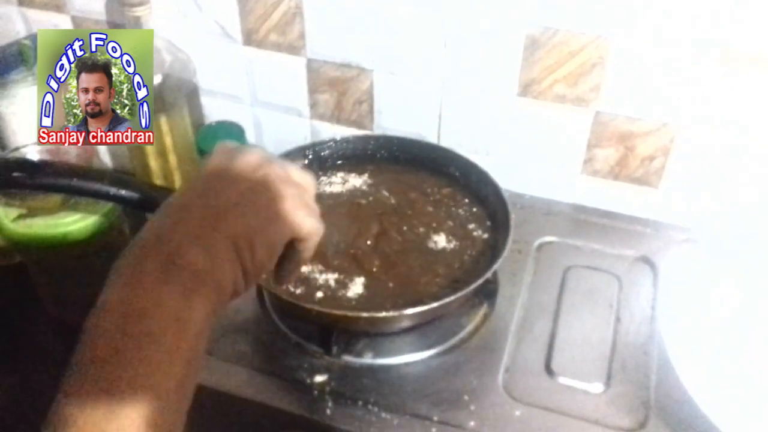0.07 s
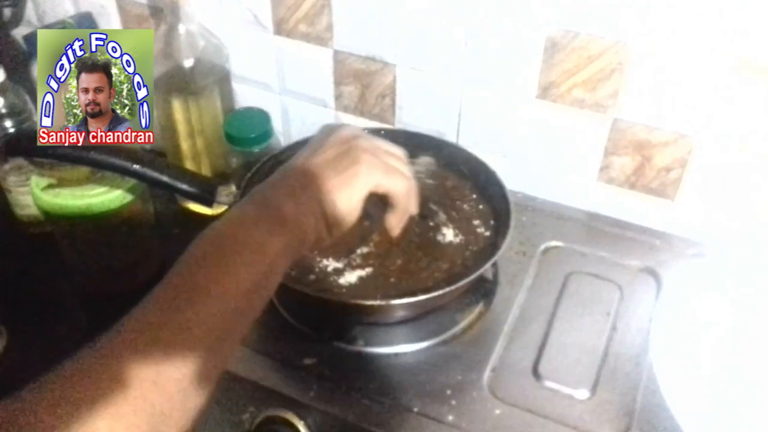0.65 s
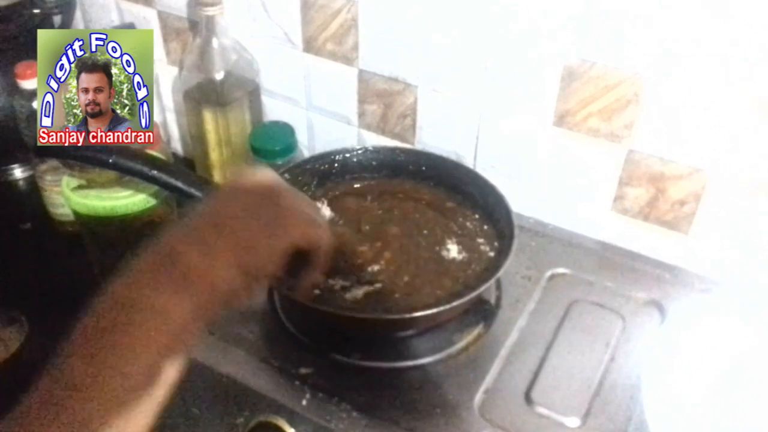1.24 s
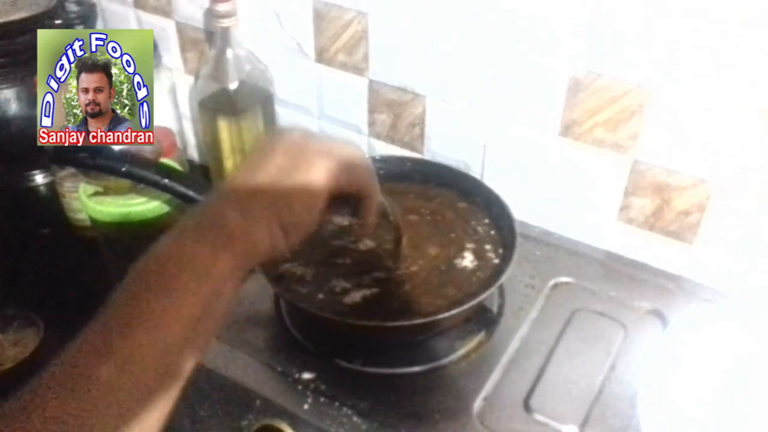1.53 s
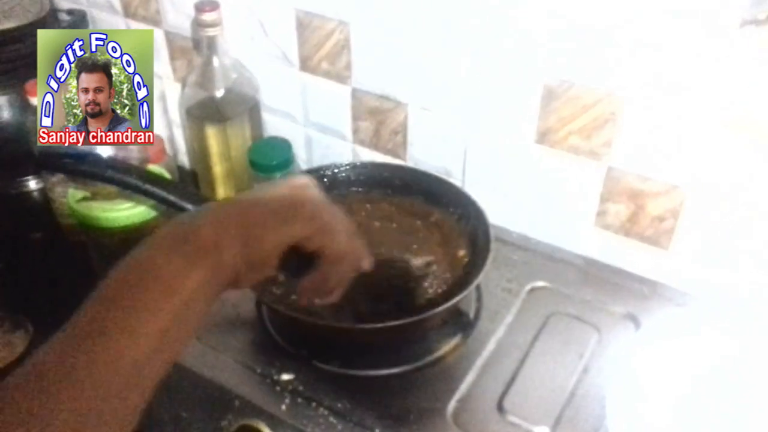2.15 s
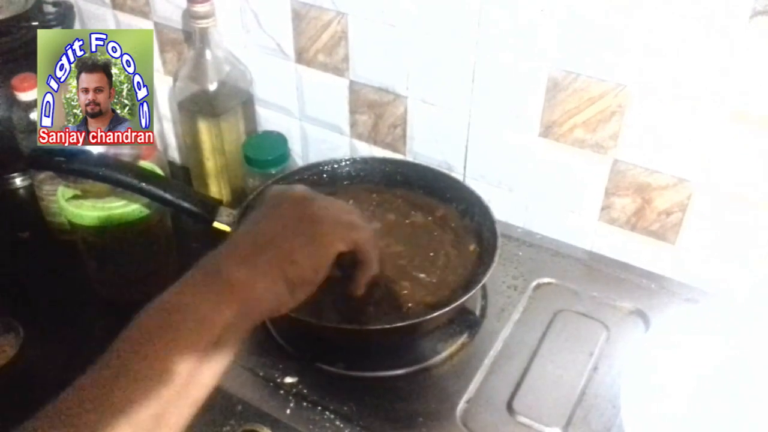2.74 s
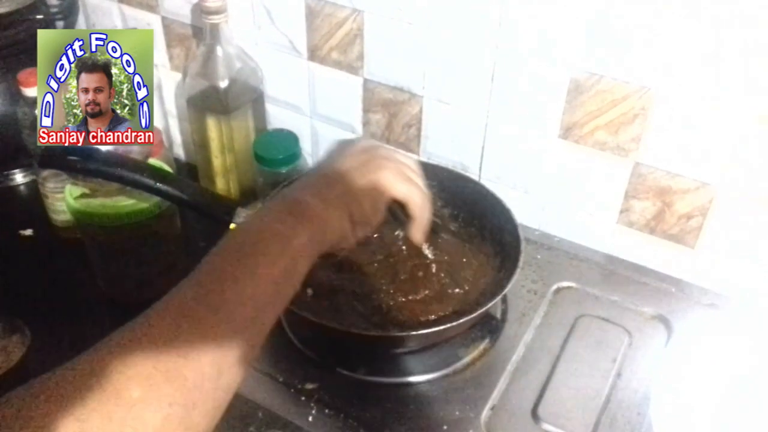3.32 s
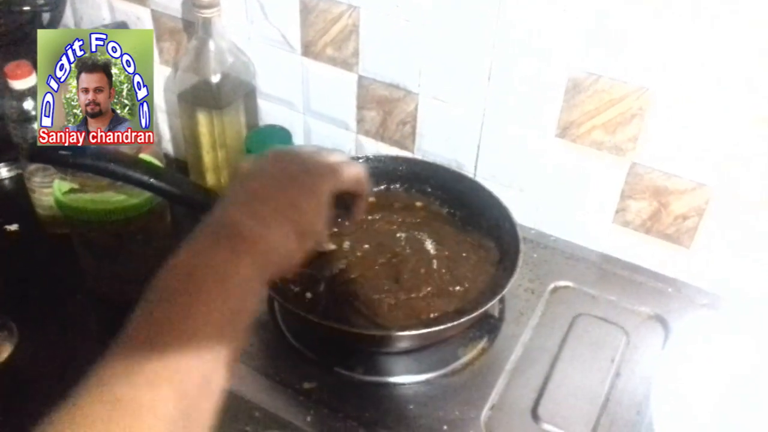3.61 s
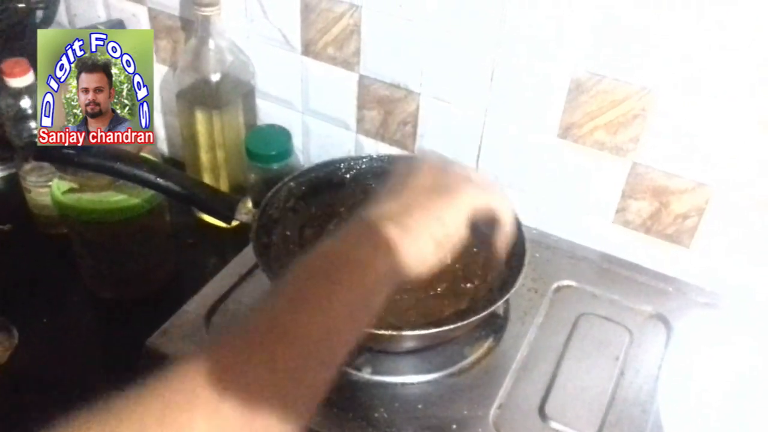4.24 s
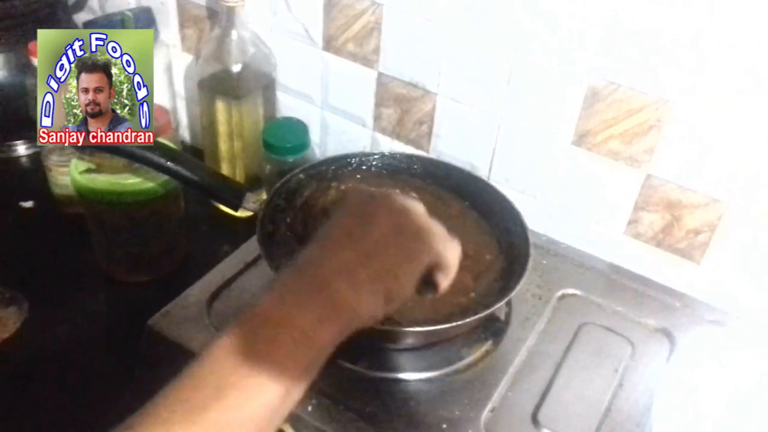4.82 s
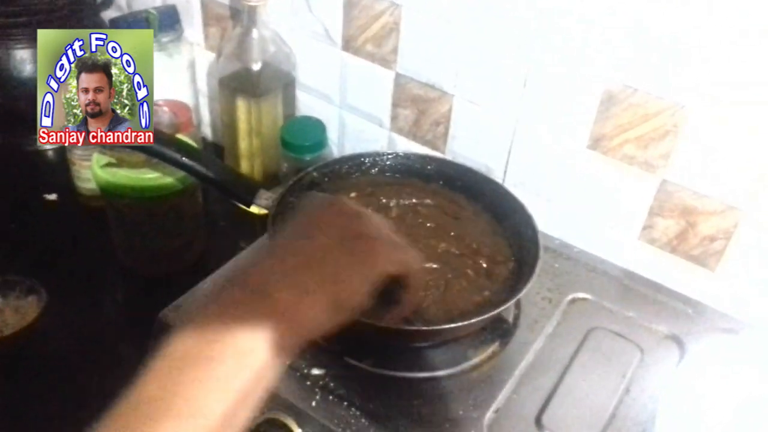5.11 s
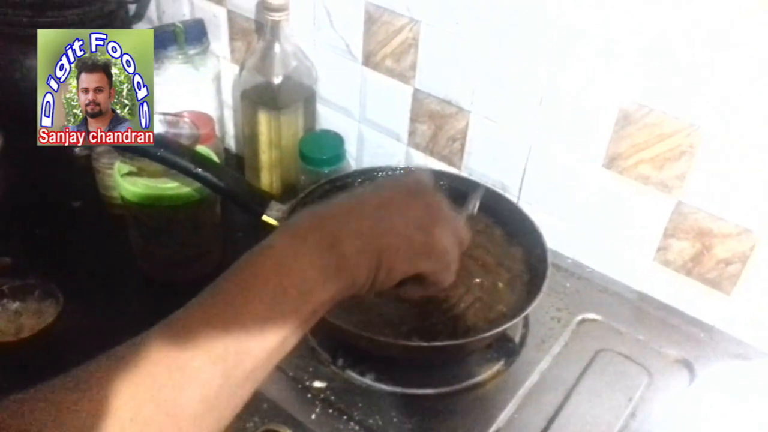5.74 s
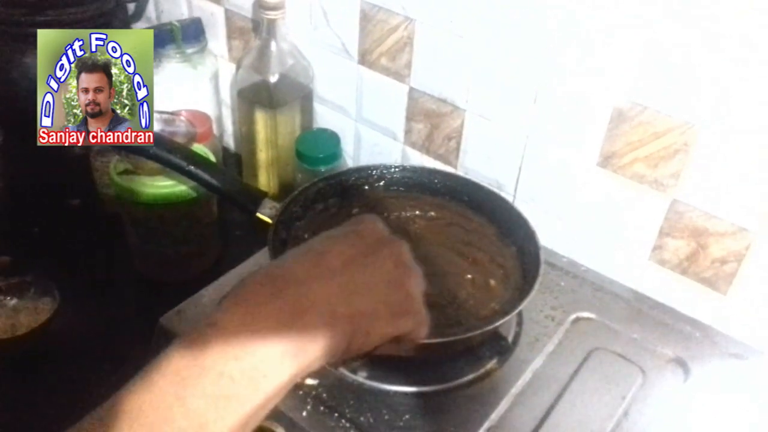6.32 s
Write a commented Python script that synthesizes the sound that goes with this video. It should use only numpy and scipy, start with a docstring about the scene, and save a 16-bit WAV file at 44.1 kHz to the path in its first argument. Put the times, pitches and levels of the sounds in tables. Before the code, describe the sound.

A finger covers the microphone, muffling a kitchen under low rumble and soft thumps. It slides off with loud, sharp cracks. Now a spoon is heard close by, stirring a thick mixture that sizzles and pops in a pan. The spoon drags, knocks, briefly judders and rasps on the bottom, while a gas burner hisses softly and a cricket chirps faintly and very high.

```python
"""At first a finger covers the microphone, and a tiled kitchen is muffled under rumble and soft thumps.
At about 1.4 s it slides off with sharp cracks, uncovering a hissing gas burner, a cricket's high, steady
wing chirps and a spoon stirring a thick sweet mixture that sizzles and pops as its bubbles burst.
The spoon drags and knocks, ringing the pan on its stand; later it judders by stick-slip friction,
and near 4.7 s its edge rasps over the gritty bottom."""
import sys
import numpy as np
from scipy import signal
from scipy.fft import rfft, irfft
from scipy.io import wavfile
from scipy.ndimage import uniform_filter1d

SR = 44100
rng = np.random.default_rng(int(sys.argv[2]) if len(sys.argv) > 2 else 0)


def master_out(mix):
    """Clip the mix to full scale and print it as 16-bit PCM to the path in sys.argv[1]."""
    frames = np.transpose(np.atleast_2d(mix))
    ceiling = np.clip(frames, -1, 1)
    pcm = np.round(ceiling * 32767).astype(np.int16)
    wavfile.write(sys.argv[1], SR, pcm)


N = 285056
TIME = np.arange(N) / SR
BINS = np.fft.rfftfreq(N, 1 / SR)


def amp(db):
    """Decibels to amplitude ratio."""
    return 10 ** (np.asarray(db) / 20)

def unit(x):
    """Normalises to rms 1."""
    return x / np.sqrt(np.mean(x ** 2) + 1e-20)

def read(points, hz):
    """Interpolates on a log-frequency axis."""
    f, value = np.transpose(points)
    return np.interp(np.log(hz + 1), np.log(f + 1), value)

def colour(x, points):
    """Filters by a magnitude response in dB."""
    return irfft(rfft(x) * amp(read(points, np.fft.rfftfreq(len(x), 1 / SR))), len(x))

def band(x, hz, q):
    """A second-order resonator of peak gain 1."""
    hz = min(hz, .4 * SR)
    return signal.lfilter(*signal.iirpeak(hz, max(q, hz / (.4 * SR)), SR), x)

def resonances(modes):
    """Steep resonance peaks add in power."""
    return sum(amp(db) ** 2 / (1 + ((BINS - hz) / width) ** 2) ** 2 for hz, width, db in modes)

def shaped_noise(magnitude):
    """Gaussian noise of rms 1 with a given spectral shape."""
    return unit(irfft(rfft(rng.standard_normal(N)) * magnitude, N))

def drift(rate_hz):
    """Slow random modulation: low-passed noise."""
    return shaped_noise(np.exp(-(BINS / rate_hz) ** 2))

def swell(middle_s, length_s):
    """A Gaussian envelope."""
    return np.exp(-(2 * (TIME - middle_s) / length_s) ** 2)

def add(mix, s, sound):
    """Superposes a sound from second s."""
    part = mix[max(round(s * SR), 0):][:len(sound)]
    part += sound[:len(part)]


# Rubbing under the finger. Each row: frequency in Hz, relative density in dB.
RUB_SPECTRUM = [(15, -37.5), (25, 1.5), (130, 6.5), (427, -7.5), (887, -23), (1230, -21), (1650, -29),
                (2990, -25.5), (4140, -26), (4490, -25), (7710, -31.5), (16000, -30)]
# Transmission past the finger. Each row: frequency in Hz, gain in dB.
FINGER_TRANSMISSION = [(200, -1), (500, -3), (1000, -6.5), (2000, -12.5), (4500, -25), (8000, -46),
                       (16000, -55.5)]
UNCOVER_S = 1.432

def finger_cover(air, rub_db=-57, lumps_db=2.5, slide_s=0.0059,
                 rest_db=-3, press_s=.26, press_db=4.5, relax_db_per_s=6.5):
    """Transmission loss: the finger muffles and rumbles as it rests, presses and relaxes, then lifts."""
    opened = .5 + .5 * np.tanh((TIME - UNCOVER_S) / slide_s)
    rub = unit(colour(rng.standard_normal(N), RUB_SPECTRUM))
    rumble = signal.sosfiltfilt(signal.butter(2, 280, fs=SR, output="sos"), rub)
    force_db = np.where(TIME < press_s, rest_db, press_db - relax_db_per_s * (TIME - press_s))
    force_db = uniform_filter1d(force_db, size=1000) + lumps_db * drift(22)
    rub = amp(rub_db) * (rub + rumble * (amp(force_db) - 1))
    return opened * air + (1 - opened) * (colour(air, FINGER_TRANSMISSION) + rub)


# Gas hiss. Each row: frequency in Hz, relative density in dB.
GAS_SPECTRUM = [(30, -19), (80, -10), (150, -1.5), (300, -18), (600, -10), (1200, 2), (2200, 0), (3000, -8),
                (5500, -5), (7500, 1.5), (9300, 0), (11000, -13), (16000, -28)]
# Jet and tube resonances. Each row: frequency in Hz, width in Hz, relative level in dB.
BURNER_MODES = [(270, 11, 8.2), (389, 15, 7.6), (844, 32, 7), (1613, 51, 9.3), (1900, 110, 3.3),
                (2286, 134, 4.9), (3940, 293, 7.2)]

def burner(level_db=-53.0, waver_db=0.6):
    """Flow noise: gas rushing through the jet excites the burner tube's resonances."""
    power = amp(read(GAS_SPECTRUM, BINS)) ** 2 + resonances(BURNER_MODES)
    return shaped_noise(np.sqrt(power)) * amp(level_db + waver_db * drift(6.6))


# The cricket's loudness. Each row: time in seconds, level in dB.
CRICKET_LEVELS = [(1.5, -51.5), (1.8, -55), (2.7, -55), (2.88, -50.5), (3.9, -51), (5.2, -51.5),
                  (6.46, -50.5)]
# Wing resonances. Each row: frequency in Hz, width in Hz, relative level in dB.
WING_MODES = [(8270, 90, -3), (8410, 88, 5), (8300, 68, -7), (8735, 37, 7)]

def cricket(chirps_per_s=9.42, crest_s=1.958, depth_db=5, uneven_db=0.1):
    """Stridulation: regular strokes excite narrow wing resonances, which never quite fall silent."""
    wings = shaped_noise(np.sqrt(resonances(WING_MODES)))
    cycle = np.cos(2 * np.pi * chirps_per_s * (TIME - crest_s))
    strokes = amp(depth_db * cycle + uneven_db * drift(24))
    return unit(wings * strokes) * amp(np.interp(TIME, *np.transpose(CRICKET_LEVELS)))


# Briskness of the spoon. Each row: time in seconds, effort in dB relative to steady stirring.
STIRRING_EFFORT = [(1.48, -3), (1.54, -4.5), (1.7, -13.5), (1.93, -23), (2.04, -0.5), (2.2, -7.5),
                   (2.35, -4.5), (2.52, -12.5), (2.7, -10.5), (2.8, -2), (2.96, 4.5), (3.12, -2),
                   (3.38, 1.5), (4.0, 0.5), (4.52, 1.5), (4.69, 7.0), (4.86, 3), (5.12, 0.5), (5.42, 2),
                   (5.6, -0.5), (5.75, 1), (6.46, 0.5)]

def effort(follow):
    """Amplitude modulation by the stirring: `follow` dB per dB of effort."""
    return amp(follow * np.interp(TIME, *np.transpose(STIRRING_EFFORT)))


# The pan on its stand. Each row: frequency in Hz, relative level in dB, 60 dB decay time in seconds.
PAN_MODES = [(261, -2.5, 0.24), (293.1, 4.5, 0.21), (332, 3.5, 0.047), (399, -9, 1), (454.8, -1, 0.34),
             (506, -4, 0.17), (535, -45, 0.15), (660, -23, 0.13), (693.5, -4, 0.23), (818, 5.5, 0.037),
             (896, 2.5, 0.048), (1110, -5.5, 0.1), (1332, -8, 0.84), (1546, -1.5, 0.21), (1780, -1, 0.071)]

def pan_ring(length):
    """Modal superposition: the pan rings as damped sinusoids of random phase."""
    t = np.arange(length) / SR
    return sum(amp(db - 60 * t / t60) * np.sin(2 * np.pi * (hz * t + rng.random()))
               for hz, db, t60 in PAN_MODES)


# Spoon friction. Each row: frequency in Hz, relative density in dB.
DRAG_SPECTRUM = [(50, -55), (110, -12.5), (200, -4.5), (280, 5), (450, -4), (650, -3.5), (1000, -6.5),
                 (2000, -17.5)]

def dragging(glide_db=-56, follow=0.72, push_db=-49, ring_db=-7, slip_db=1.5):
    """Sliding friction drives the pan's modes, lightly as the spoon glides and harder in each push."""
    rub = rng.standard_normal(N) * amp(slip_db * drift(30))
    body = unit(signal.oaconvolve(rub, pan_ring(SR // 4))[:N])
    level = np.hypot(amp(glide_db) * effort(follow), amp(push_db) * pushes())
    return level * unit(unit(colour(rub, DRAG_SPECTRUM)) + amp(ring_db) * body)


def grains(per_s, spread_db, low_hz, high_hz, cycles, count=24):
    """Shot noise: tiny random bursts, each a damped ring, in many pitches and sizes."""
    out = np.zeros(N)
    for hz in np.geomspace(low_hz, min(high_hz, .45 * SR), count):
        turns = np.arange(600) * hz / SR
        ring = np.sin(2 * np.pi * turns) * np.exp(-turns / cycles) * np.sqrt(hz)
        size = amp(spread_db * np.minimum(rng.exponential(1, N), 4))
        onsets = rng.random(N) < per_s / count / SR
        out += signal.oaconvolve(size * onsets, ring)[:N]
    return unit(out)

def texture(grain, share, spectrum):
    """Incoherent sum: near grains take a share of the power, a blur of smaller ones the rest."""
    blur = np.sqrt(1 - share) * rng.standard_normal(N)
    return unit(colour(np.sqrt(share) * grain + blur, spectrum))


# The pan's hollow. Each row: frequency in Hz, width in Hz, relative level in dB.
CAVITY_MODES = [(845, 108, 11), (1662, 100, 2.5), (2355, 140, 0), (3840, 380, 0), (8430, 214, 18.5)]

def pan_cavity(x):
    """Cavity resonance colours a sound in the pan; the result has rms 1."""
    return unit(irfft(rfft(x) * np.sqrt(1 + resonances(CAVITY_MODES)), N))


# Churning mixture, sizzle and fine spray. Each row: frequency in Hz, relative density in dB.
CHURN_SPECTRUM = [(300, -8), (600, -17.5), (880, -4), (1200, 2), (1660, 7), (2300, 5), (3000, -1),
                  (3800, 6), (6000, -22)]
SIZZLE_SPECTRUM = [(1500, -15), (3000, -13), (3900, 5), (5000, 5), (6000, 0.5), (7000, 5), (7800, -8),
                   (9200, 1), (10500, -38), (13000, -22), (16000, -44)]
SPRAY_SPECTRUM = [(6000, -10.5), (9000, 1), (11000, -11), (13000, -15), (16000, -42)]

def frying(churn_db=-48.0, sizzle_db=-49, spray_db=-58.5, bared_db=-55, flicker_db=0.84):
    """Boiling: stirring churns the mixture onto hot metal; pushes bare the bottom and add spray."""
    wet = texture(grains(per_s=700, spread_db=-0.5, low_hz=579.6, high_hz=4040, cycles=8.2),
                  0.14, CHURN_SPECTRUM)
    fizz = texture(grains(per_s=900, spread_db=0.5, low_hz=2920, high_hz=10250, cycles=4.5),
                   0.3, SIZZLE_SPECTRUM)
    mist = texture(grains(per_s=390, spread_db=8.0, low_hz=8550, high_hz=15700, cycles=9.7),
                   0.081, SPRAY_SPECTRUM)
    churn = amp(churn_db) * effort(follow=1.0) * pan_cavity(wet)
    sizzle = np.hypot(amp(sizzle_db) * effort(follow=1.12), flares()) * pan_cavity(fizz)
    spray = np.hypot(amp(spray_db) * effort(follow=2.65), amp(bared_db) * pushes()) * mist
    return (churn + sizzle + spray) * amp(flicker_db * drift(31))

def spits(level_db=-57, follow=0.55):
    """Sparse shot noise: tiny drops spit out of the sizzle."""
    drops = grains(per_s=45, spread_db=3, low_hz=4200, high_hz=10500, cycles=7)
    return drops * amp(level_db) * effort(follow)

def pop(hz, width_hz=1450, snap_db=-13, t60_s=0.016):
    """Transient excitation: a bubble's skin tears and rings the cavity under it."""
    t = np.arange(2048) / SR
    tear = rng.standard_normal(len(t)) * amp(-60 * t / t60_s)
    q = min(hz / width_hz, 3.8)
    burst = band(band(tear, hz, q), hz, q / 2) + amp(snap_db) * band(tear, hz, q / 3)
    return burst / np.std(burst[:SR // 500])

def simmer(count, centre_hz, level_db=-41.5, spread_db=3.5, pitch_spread=0.15):
    """Like bubbles resonate alike: middling ones burst at random, louder while the spoon is brisk."""
    out, level = np.zeros(N), effort(follow=1.0)
    for k, (when, size, pitch) in enumerate(2 * rng.random((count, 3)) - 1):
        at = int((k + when) % count * N / count)
        burst = pop(centre_hz * (1 + pitch_spread * pitch))
        add(out, at / SR, level[at] * amp(level_db + spread_db * size) * burst)
    return out


def slip(s, hz, damping=2.7, open_edge_hz=12000, loosen_s=0.012):
    """A pressure step leaks from the port in one damped swing; a looser seal sharpens its edge."""
    t = np.arange(4096) / SR
    looseness = np.exp(min(s - UNCOVER_S, 0) / loosen_s)
    edge_hz = np.clip(open_edge_hz * looseness, 2.6 * hz, 7.2 * hz)
    swing = -np.cos(2 * np.pi * hz * t + np.arctan(damping / (2 * np.pi))) * np.exp(-damping * hz * t)
    for corner in (edge_hz, 2 * edge_hz):
        swing = signal.lfilter(*signal.butter(1, min(corner, .45 * SR), fs=SR), swing)
    return swing / abs(swing).max()


# Slips on the microphone port. Each row: start in seconds, peak level in dB, swing frequency in Hz.
FINGER_SLIPS = [(0.071, -43, 91), (0.12, -41, 100), (0.628, -31.5, 104), (0.721, -26.5, 84.5),
                (0.789, -30.5, 69.6), (1.236, -35.5, 202), (1.328, -32.5, 269), (1.3662, -24.5, 1560),
                (1.381, -19, 308), (1.385, -18, 226), (1.4045, -21, 500), (1.4165, -2, 1470),
                (1.417, -6, 290), (1.424, -11, 1000), (1.434, -9.5, 980), (1.462, -5, 880)]
# Skin scrapes. Each row: middle in seconds, length in seconds, level in dB, centre frequency in Hz.
SKIN_SCRAPES = [(1.418, 0.0062, -25.5, 1920), (1.445, 0.0084, -46, 7200), (1.46, 0.0023, -27.5, 8000)]

def finger_noise(crunch_db=-27, crunch_from_s=1.396, crunch_s=.056, swing_hz=750, count=14):
    """Stick-slip: the finger thumps; as it leaves it cracks, tiny slips crunch and the skin drags."""
    out = np.zeros(N)
    for s, db, hz in FINGER_SLIPS:
        add(out, s, amp(db) * slip(s, hz))
    for k, (when, size, pitch) in enumerate(rng.random((count, 3))):
        s = crunch_from_s + crunch_s * (k + when) / count
        add(out, s, amp(crunch_db) * size * slip(s, swing_hz * (.5 + pitch)))
    for s, length, db, hz in SKIN_SCRAPES:
        scrape = unit(band(rng.standard_normal(N), hz, q=3))
        out += amp(db) * scrape * swell(s, length)
    return out


# Rattle of stand and stove top. Each row: frequency in Hz, relative density in dB.
RATTLE_SPECTRUM = [(80, -32), (180, -36), (280, -3.5), (480, -19.5), (800, -5), (1500, -13), (2500, -3),
                   (5000, -35)]
# Spoon blows. Each row: start in seconds, relative level in dB, centre in Hz, rattle decay in seconds.
SPOON_KNOCKS = [(0.277, -33, 434, 0.31), (0.53, -39, 1110, .07), (0.565, -39, 1140, 0.057),
                (0.916, -31, 485, .55), (1.049, -34.5, 565, .28), (1.353, -21.5, 585, 0.29),
                (2.012, -26.5, 320, 0.27), (2.725, -28, 410, 0.37), (2.929, -36, 443, 0.29),
                (3.515, -31.5, 650, 0.29), (3.819, -22.5, 1000, 0.071), (3.834, -31, 595, .11),
                (4.372, -27, 288, 0.099), (4.971, -30, 860, 0.35), (5.204, -19.5, 556, 0.21),
                (5.407, -31, 400, 0.09)]

def knocks(level_db=-12, ring_db=-8, rattle_db=-3, q=1.0, rise_s=0.0013, hardness=3.1):
    """Impact excitation: the pan rings and its stand rattles; lower-pitched blows are duller."""
    out, t = np.zeros(N), np.arange(16384) / SR
    attack = 1 - np.exp(-t / rise_s)
    for s, db, hz, t60 in SPOON_KNOCKS:
        rattle = unit(colour(rng.standard_normal(len(t)), RATTLE_SPECTRUM)) * amp(-60 * t / t60)
        ring = pan_ring(len(t)) * amp(-30 * t / t60)  # spoon and mixture damp the pan
        blow = band(amp(rattle_db) * rattle + amp(ring_db) * ring / np.std(ring[:SR // 40]), hz, q)
        blow = signal.lfilter(*signal.butter(2, min(hardness * hz, .4 * SR), fs=SR), blow)
        add(out, s, amp(db + level_db) * blow / np.std(blow[:SR // 40]) * attack)
    return out


# The largest bubbles. Each row: start in seconds, relative level in dB, pitch in Hz.
BIG_BUBBLES = [(1.05, -16.5, 4970), (2.031, -23.5, 4220), (2.079, -27, 5330), (2.174, -33.5, 4470),
               (2.269, -32.5, 4860), (2.348, -33.5, 4270), (2.869, -24, 4200), (2.929, -25, 4860),
               (2.985, -23, 7230), (3.187, -34.5, 4560), (3.528, -33, 5440), (3.819, -25, 4770),
               (3.842, -25.5, 5300), (4.003, -34, 4740), (4.103, -31, 4140), (4.144, -32, 4860),
               (4.262, -27, 5150), (4.354, -25.5, 4530), (4.364, -32, 11800), (4.546, -27, 8800),
               (4.972, -25, 4000), (5.177, -30.5, 4960), (5.355, -27.5, 4800), (5.406, -29.5, 5750),
               (5.678, -31.5, 7000), (6.204, -32, 7240)]

def big_pops(level_db=-6):
    """Film rupture: the largest bubbles snap one by one, each at its own resonance."""
    out = np.zeros(N)
    for s, db, hz in BIG_BUBBLES:
        add(out, s, amp(db + level_db) * pop(hz))
    return out


# Surges of sizzle. Each row: start in seconds, level in dB.
SIZZLE_FLARES = [(1.47, -52), (2.975, -35.5), (4.68, -38), (4.81, -40), (5.672, -43)]

def flares(rise_s=.006, t60_s=0.31):
    """Flash boiling: the sizzle's level leaps as wet mixture meets bare hot metal, then decays."""
    return sum(amp(db - 60 * np.maximum(TIME - s, 0) / t60_s) * np.clip((TIME - s) / rise_s, 0, 1)
               for s, db in SIZZLE_FLARES)


# The spoon bears down. Each row: start in seconds, length in seconds, relative force in dB.
SPOON_PUSHES = [(2.092, 0.38, -9), (2.735, 0.23, -7), (3.195, 0.4, 1), (3.494, 0.43, -0.5),
                (4.343, 0.49, 1), (5.3, 0.25, 3.5)]

def pushes(rise_s=0.11, fall_s=0.16):
    """Normal force of the spoon on the bottom: each push ramps up and lets go."""
    return sum(amp(db) * np.clip(np.minimum((TIME - s) / rise_s, (s + length - TIME) / fall_s), 0, 1)
               for s, length, db in SPOON_PUSHES)


# The spoon judders. Each row: middle in seconds, level in dB, pitch in Hz, length in seconds.
SPOON_JUDDERS = [(3.348, -45.5, 276, 0.12), (3.617, -46.5, 252, 0.078), (3.697, -45, 275, 0.14),
                 (4.44, -52, 276, 0.23), (4.53, -49.5, 430, 0.12)]

def judders(q=5.7):
    """Stick-slip friction: the spoon catches unevenly and the pan groans for a moment."""
    out = np.zeros(N)
    for s, db, hz, length in SPOON_JUDDERS:
        groan = unit(band(band(rng.standard_normal(N), hz, q), hz, q))
        out += amp(db) * groan * swell(s, length)
    return out

def rasp(at_s=4.67, length_s=0.13, level_db=-46, hz=2650):
    """Roughness noise: in the briskest stroke the spoon's edge scrapes the gritty bottom."""
    grit = grains(per_s=1500, spread_db=2, low_hz=1800, high_hz=7000, cycles=3)
    return amp(level_db) * unit(band(grit, hz, q=2.7)) * swell(at_s, length_s)


# The kitchen's decay. Each row: frequency in Hz, reverberation time in seconds.
REVERB_TIMES = [(200, 0.69), (1000, 0.34), (4000, 0.077), (14000, 0.27)]

def kitchen(x, echoes_per_s=3000):
    """Reverberation: tiled walls return dense echoes that last longest in the bass."""
    taps = rng.standard_normal(SR // 2) * (rng.random(SR // 2) < echoes_per_s / SR)
    taps[:SR // 300] = 0  # gap before the first reflection
    hz, t, spectra = signal.stft(taps, SR, nperseg=256)
    decay = amp(-60 * t / read(REVERB_TIMES, hz)[:, None])
    tail = signal.istft(spectra * decay, SR, nperseg=256)[1]
    return signal.fftconvolve(x, tail / np.linalg.norm(tail))[:N]


# Level between the ports. Each row: frequency in Hz, left minus right in dB.
PORT_LEVEL_GAP = [(4200, 0), (6400, -1), (8400, -2.7), (9800, -2.4), (12000, 0)]
# Phase between the ports. Each row: frequency in Hz, lead of the left in radians.
PORT_PHASE_LEAD = [(5000, 0), (7700, -.35), (8350, .5), (8800, .4), (9800, 0)]
# Faint stereo width: a slight difference between left and right. Each row: frequency in Hz, gain in dB.
STEREO_WIDTH = [(100, -38), (3000, -37), (7000, -26), (15000, -20)]

def ports(x):
    """Stereo cues: two close microphone ports differ near their treble resonance; faint width is added."""
    half = amp(read(PORT_LEVEL_GAP, BINS) / 2) * np.exp(.5j * read(PORT_PHASE_LEAD, BINS))
    pair = irfft(rfft(x) * np.array([half, 1 / half]), N)
    return pair + colour(kitchen(x), STEREO_WIDTH) * np.array([[1], [-1]])


# Microphone noise. Each row: frequency in Hz, relative density in dB.
FLOOR_SPECTRUM = [(20, -28), (70, -22), (140, -9), (300, -44), (1000, 21), (4000, 10), (16000, -76)]

def self_noise(level_db=-82):
    """Uncorrelated noise: each microphone adds a faint floor of its own."""
    floors = [unit(colour(rng.standard_normal(N), FLOOR_SPECTRUM)) for port in range(2)]
    return amp(level_db) * np.array(floors)


def scene():
    """Superposition: pan, burner and cricket add in the air and pass the finger to the ports."""
    begun = amp(np.interp(TIME, [1.3, 1.45], [-9, 0]))  # the first strokes are gentle
    small_bubbles = simmer(count=24, centre_hz=5040) + simmer(count=12, centre_hz=9450) + spits()
    blows = knocks()
    bubbles = big_pops() + begun * small_bubbles
    pan = begun * (dragging() + frying()) + judders() + rasp() + blows + bubbles
    pan += kitchen(amp(-7) * blows + amp(-1.5) * bubbles)
    # the pan is too small to radiate deep bass
    pan = signal.sosfilt(signal.butter(2, 70, "high", fs=SR, output="sos"), pan)
    air = pan + burner() + cricket()
    return ports(finger_cover(air) + finger_noise()) + self_noise()

def record(dry, low_hz=32, high_hz=15900):
    """Band limiting: a gentle bass roll-off and a steep treble cut."""
    dry = signal.sosfilt(signal.butter(2, low_hz, "high", fs=SR, output="sos"), dry)
    lowpass = signal.firwin(511, high_hz, window=("kaiser", 9), fs=SR)
    return signal.oaconvolve(dry, lowpass[None], "same")


dry = scene()
out = record(dry)
master_out(out)
```